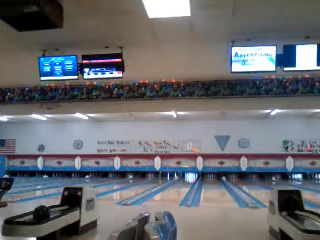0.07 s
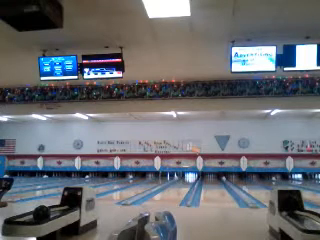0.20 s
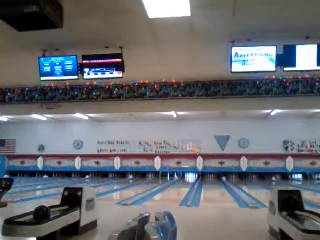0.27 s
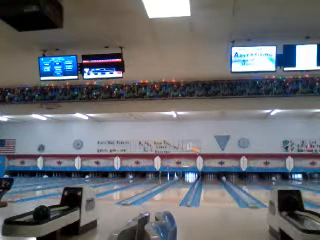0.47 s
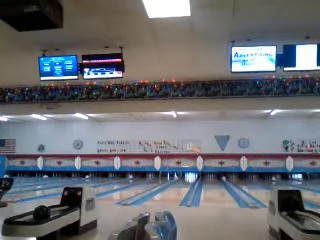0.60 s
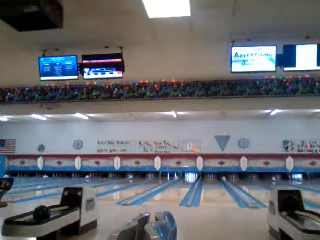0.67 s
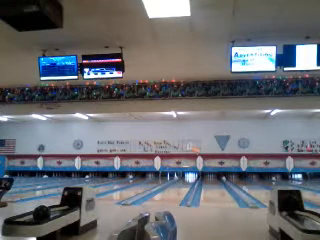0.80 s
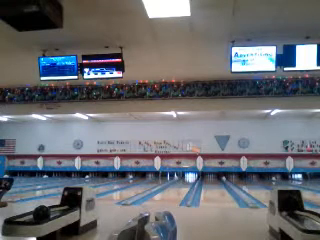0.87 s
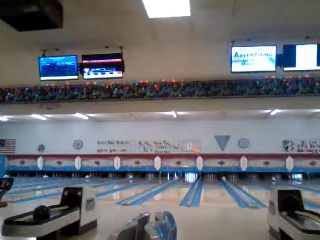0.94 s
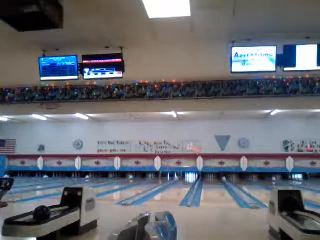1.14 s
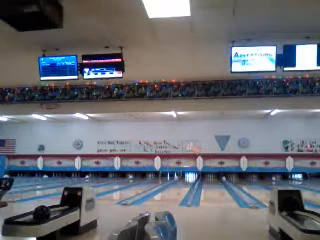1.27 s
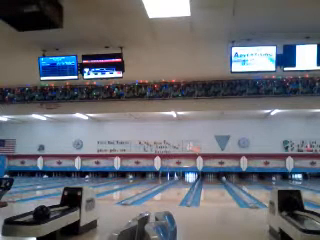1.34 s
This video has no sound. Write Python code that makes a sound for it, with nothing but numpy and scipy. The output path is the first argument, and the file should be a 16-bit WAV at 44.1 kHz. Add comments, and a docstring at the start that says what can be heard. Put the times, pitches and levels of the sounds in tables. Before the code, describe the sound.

Bowling strike at the far end of a lane: one loud hit, a dense burst of hollow pin clatter, then scattered knocks and soft rumble fading into hall echo and machine hum, narrow muffled sound.

```python
"""Bowling strike at the far end of a lane in a big reverberant hall, over a steady drone of coloured noise.
The ball cracks into the head pin; heavy knocks are strongly damped tones with bursts of contact noise.
Pins clack together and ring as decaying sines, while chance taps through resonances make them rattle and skid.
Deep thumps follow on deck and pit cushion, the ball rumbles as low noise, and pins clatter into the pit.
A dull microphone narrows the band and clips the loudest peaks."""
import sys
import numpy as np
from scipy import signal
from scipy.fft import rfft, irfft, next_fast_len
from scipy.io import wavfile
from scipy.ndimage import map_coordinates

SR = 44100
rng = np.random.default_rng(int(sys.argv[2]) if len(sys.argv) > 2 else 0)


def pcm_store(signal):
    """Save signal as 16-bit PCM."""
    levels = np.round(np.clip(np.atleast_2d(signal), -1, 1) * 32767)
    wavfile.write(sys.argv[1], SR, levels.astype(np.int16).T)


N = 63945  # length in samples

# the ball meets the head pin: t/s, envelope peak/dB, f/Hz, crack relative to the blow/dB
STRIKE = (.2236, -1.6, 655, -14)


def amp(db):
    """Decibels to linear gain."""
    return 10 ** (np.asarray(db) / 20)


def unit(x):
    """Scale a signal to an rms of 1."""
    return x / np.sqrt(np.mean(x ** 2) + 1e-20)


def clock():
    """Time of every sample in seconds."""
    return np.arange(N) / SR


def level(points):
    """Gain curve through points of t/s, level/dB, drawn straight in dB; -120 dB before the first."""
    t, db = np.transpose(points)
    return amp(np.interp(clock(), t, db, left=-120))


def filtered(x, response):
    """Multiply the spectrum of x by a response given as a function of frequency."""
    size = next_fast_len(N + SR // 2)  # spare room against wrap-around
    spectrum = rfft(x, size) * response(np.fft.rfftfreq(size, 1 / SR))
    return irfft(spectrum, size)[:N]


def noise(color):
    """Noise of rms 1, its spectrum drawn through points of f/Hz, level/dB on a log frequency axis."""
    hz, db = np.transpose(color)
    white = rng.standard_normal(N)
    return unit(filtered(white, lambda f: amp(np.interp(np.log(f + 1), np.log(hz), db))))


def resonate(x, body):
    """Drive parallel resonances, each a second-order bandpass of f/Hz, width/Hz, level/dB."""
    def response(f):
        return sum(amp(db) * 1j * f * width / (hz * hz - f * f + 1j * f * width) for hz, width, db in body)
    return filtered(x, response)


def add(out, x, t):
    """Mix x into out from t seconds on."""
    start = round(t * SR)
    out[start:start + len(x)] += x[:N - start]


def in_hall(x):
    """Direct sound, short scatter around the pin deck and a long hall tail, both drawn anew at each call."""
    # level/dB against the direct sound, t60/s, delay/s
    near_scatter = (-5.5, 0.1, 0.006)
    hall_tail = (-4.5, 1.275, 0.02)
    impulse_response = np.zeros(N)
    impulse_response[0] = 1
    for db, t60, delay in (near_scatter, hall_tail):
        tail = rng.standard_normal(N) * amp(-60 * clock() / t60)
        add(impulse_response, amp(db) * tail / np.linalg.norm(tail), delay)
    return signal.fftconvolve(x, impulse_response)[:N]


def drone():
    """Machines and rolling on other lanes: coloured noise whose level wavers at random."""
    # noise colour: f/Hz, level/dB
    drone_color = [(15, -71.5), (25, -45.5), (80, -24.5), (144, -18.5), (305, -6), (384, 4), (454, -6.5),
                   (547, -1.5), (607, -1.5), (1070, -14.5), (1140, -16.5), (1260, -21), (1370, -17.5),
                   (1990, -25.5), (2170, -20.5), (2730, -33.5), (3650, -31.5), (4740, -58.5), (8030, -120)]
    drone_db, waver_db, wavers_per_s = -38.5, 1.9, 21
    knots = rng.standard_normal(200)
    waver = map_coordinates(knots, [clock() * wavers_per_s], mode="mirror")  # smooth curve through knots
    return amp(drone_db + waver_db * waver) * noise(drone_color)


def ball_rumble():
    """The ball in the pit: low noise that swells and fades."""
    # noise colour: f/Hz, level/dB
    rumble_color = [(40, -16.5), (90, -10), (130, -20), (165, -2), (260, 4.5), (400, 2), (800, -44),
                    (2000, -92)]
    # fader moves: t/s, level/dB
    rumble_fader = [(.22, -70.5), (.34, -49), (.48, -32.5), (.6, -37), (.9, -33.5), (1.1, -38),
                    (1.2, -42.5), (1.35, -51.5)]
    return level(rumble_fader) * noise(rumble_color)


def damped(t, hz, cycles):
    """A strongly damped body: a tone that swells to its peak after the given cycles, then dies away."""
    steepness = 1.98  # of rise and fall
    u = t * hz / cycles
    envelope = (u * np.exp(1 - u)) ** steepness
    return envelope * np.sin(2 * np.pi * hz * t)


def crack(t):
    """The contact noise of a hard hit: a coloured burst with exponential decay."""
    # noise colour: f/Hz, level/dB
    contact_color = [(100, -25.5), (500, 11), (1300, 10), (1700, 1.5), (2400, -13), (2900, -26.5),
                     (3400, -22), (4200, -19.5), (8000, -49)]
    t60_s = 0.023
    return noise(contact_color)[:len(t)] * amp(-60 * t / t60_s)


def knocks():
    """Ball and pins hit pins, deck and boards: a few cycles of a damped body plus a crack, in the hall."""
    # heavy knocks: t/s, envelope peak/dB, f/Hz, crack relative to the knock/dB
    heavy_hits = [(0.2227, -23, 705, 1.5), (.2315, -11, 768, -22), (.238, -22.5, 607, -0.5),
                  (.2455, -17.5, 700, -22.5), (.2762, -12.5, 735, -16.5), (.2862, -6, 710, -38),
                  (.3142, -10.5, 711, -13), (.329, -14, 410, -26.5), (.3372, -17.5, 549, -19),
                  (.388, -14, 398, -39), (.4081, -5, 549.6, -29.5), (.4131, -7, 691, -22),
                  (.4345, -18.5, 553, -3.5), (0.4452, -34, 494, -25.5), (.468, -10.5, 517, -9.5),
                  (0.474, -10, 420, -16.5), (0.485, -21, 307.5, -3), (0.5437, -12.5, 407, -6),
                  (.608, -20.5, 372, -27.5), (0.632, -17.5, 467, -18.5), (.6555, -13.5, 595, -14.5),
                  (0.674, -21, 454, -7), (.6802, -13, 480, -13.5), (0.702, -15.5, 470, -11),
                  (.759, -14.5, 411, -9), (.798, -19, 398, -19.5), (0.8444, -11, 384, -27.5),
                  (.857, -19, 486, -14), (0.9185, -18, 497, -29), (0.9233, -14.5, 465, -22.5),
                  (.96, -14.5, 454, -22.5), (.976, -15, 610, -21), (.985, -16, 579, -26.5),
                  (1.041, -22.5, 451, -9.5), (1.062, -18, 606, -27), (1.085, -22, 290, -13),
                  (1.115, -21, 305.7, -13), (1.1516, -15.5, 548, -26), (1.158, -18, 706, -38),
                  (1.166, -26, 433, -20.5), (1.22, -28, 546, -7.5)]
    cycles_to_peak = 1.114
    out, t = np.zeros(N), np.arange(SR // 8) / SR
    for start, db, hz, crack_db in [STRIKE, *heavy_hits]:
        body = damped(t, hz, cycles_to_peak)
        hit = body + amp(crack_db) * crack(t)
        add(out, in_hall(amp(db) * hit), start)
    return out


def ring(modes, t):
    """Struck pin modes: decaying sines of f/Hz, level/dB, t60/s behind a softened attack."""
    attack_s = 0.0015  # time constant
    tone = sum(amp(db - 60 * t / t60) * np.sin(2 * np.pi * hz * t) for hz, db, t60 in modes)
    return tone * (1 - np.exp(-t / attack_s))


def clacks():
    """Pin on pin: each clack rings in modes around its own pitch, with a crack; the head pin has its own modes."""
    # head pin, rung by the full force of the ball: f/Hz, level/dB, t60/s
    head_pin = [(678.4, -16, 0.22), (1444, -39.5, .2), (1490, -35.5, 0.25), (1870, -33.5, 0.041),
                (2256, -37, .06), (3355, -30, 0.038), (3634, -26.5, .035)]
    # clacks, pins in flight ring longest: t/s, level/dB, main ring f/Hz, main ring t60/s
    pin_hits = [(0.223, -17, 1024, .15), (.228, -18.5, 793, .2), (.2495, -7, 1112, .06),
                (.263, -17, 999.6, .35), (0.276, -15, 1075, .12), (0.3099, -5, 1226, .05),
                (0.3217, -5.5, 1148, .1), (.3305, -11, 1203, .08), (.343, -20.5, 1036, .2),
                (.362, -16.5, 998, 0.098), (.3745, -11.5, 1211, .12), (0.3997, -9, 1195, .1),
                (.421, -12.5, 1106, .08), (0.4337, -7.5, 1168, .08), (0.454, -25.5, 1240, .2),
                (.469, -12, 1170, .06), (.507, -14, 1130, .1), (.522, -18.5, 1223, .25),
                (0.542, -24.5, 1176, .08), (.586, -23.5, 1218, .2), (0.601, -31.5, 1084, .06),
                (.654, -21, 1199, .15), (0.674, -17.5, 1204, .06), (.691, -19.5, 1198, .1),
                (0.761, -19.5, 1191, .2), (.783, -19.5, 1190, .08), (.809, -23.5, 1220, .08),
                (.866, -27, 1114, 0.056), (0.918, -22.5, 994, 0.072), (.959, -21, 891, 0.15),
                (0.968, -26, 1216, .08), (1.012, -21, 1062, .05), (1.2, -22.5, 1038, 0.075)]
    # modes of a pin: ratio to main ring, level/dB, share of its t60
    pin_modes = [(.565, -9.5, 0.84), (.74, -11.5, .8), (1, -1.5, 0.59), (1.27, -25, 0.35),
                 (1.62, -26.5, 0.53), (2.02, -34, 0.3), (2.85, -43.5, 0.13)]
    crack_db = -16.5  # relative to the clack
    out, t = np.zeros(N), np.arange(SR // 2) / SR
    add(out, in_hall(ring(head_pin, t)), STRIKE[0])
    for start, db, hz, t60 in pin_hits:
        # mode levels vary by about 1 dB from hit to hit
        modes = [(hz * ratio, mode_db + rng.standard_normal(), t60 * share)
                 for ratio, mode_db, share in pin_modes]
        hit = ring(modes, t) + amp(crack_db) * crack(t)
        add(out, in_hall(amp(db) * hit), start)
    return out


def rattle(fader, body):
    """Many light contacts at chance moments and strengths, in the hall, ring a resonant body."""
    contacts_per_s, scatter_db = 170, 3
    touches = rng.random(N) < contacts_per_s / SR
    polarity = rng.choice([-1, 1], N)
    strength = amp(scatter_db * np.clip(rng.standard_normal(N), -2, 2))
    taps = touches * polarity * strength
    return level(fader) * unit(resonate(in_hall(taps), body))


def pin_rattle():
    """Tumbling pins: light contacts ring narrow pin resonances."""
    # fader moves: t/s, level/dB
    pin_fader = [(.225, -23.5), (.25, -45), (.33, -31), (.45, -33), (.6, -40), (.8, -41), (1, -48),
                 (1.25, -50), (1.45, -56.5)]
    # pin resonances: f/Hz, width/Hz, level/dB
    pin_body = [(680, 8.7, 1.5), (775, 23, 4.5), (899, 10, -4), (993, 2.2, 13.5), (1092, 8, -9.5),
                (1014, 19, -7), (1199, 9, 10), (1276, 5.6, 7.5)]
    return rattle(pin_fader, pin_body)


def deck_rattle():
    """Pins tumbling on the deck: light contacts ring its lower resonances."""
    # fader moves: t/s, level/dB
    deck_fader = [(.225, -48), (.33, -38), (.45, -34), (.6, -32.5), (.7, -32.5), (.88, -36), (.97, -42.5),
                  (1.13, -42.5), (1.22, -61), (1.45, -59.5)]
    # deck resonances: f/Hz, width/Hz, level/dB
    deck_body = [(256, 30, -2), (298.6, 8.3, 20.5), (375, 14, 0.5), (410, 11, -8.5), (510, 10, 1.5),
                 (503, 14, -3.5), (603, 47, -13), (675, 70, 6), (833.3, 100, -15)]
    return rattle(deck_fader, deck_body)


def scrape():
    """Pins skidding and chattering: light contacts through broad, high resonances."""
    # fader moves: t/s, level/dB
    scrape_fader = [(.225, -62), (.33, -52.5), (.45, -43.5), (.58, -59), (.69, -41), (.8, -54.5),
                    (.95, -84), (1.09, -50), (1.16, -90), (1.45, -89)]
    # scrape resonances: f/Hz, width/Hz, level/dB
    scrape_body = [(1430, 300, -20.5), (1950, 200, 19), (2400, 100, -21), (3350, 1800, -14.5)]
    return rattle(scrape_fader, scrape_body)


def thumps():
    """The deck and the pit's cushion give deep damped tones, mixed in dry."""
    # thumps: t/s, envelope peak/dB, f/Hz
    deep_hits = [(0.334, -41.5, 80), (0.387, -44, 70), (.464, -36.5, 92), (.835, -37.5, 90),
                 (1.068, -33.5, 160)]
    cycles_to_peak = 1.1
    out, t = np.zeros(N), np.arange(SR // 8) / SR
    for start, db, hz in deep_hits:
        add(out, amp(db) * damped(t, hz, cycles_to_peak), start)
    return out


def pit_rattle():
    """Pins landing in the pit: light contacts ring its resonances."""
    # fader moves: t/s, level/dB
    pit_fader = [(.87, -60), (.92, -33.5), (.975, -38.5), (1.03, -38.5), (1.11, -48), (1.16, -42.5),
                 (1.24, -47), (1.36, -50)]
    # pit resonances: f/Hz, width/Hz, level/dB
    pit_body = [(525, 17, -9.5), (655, 76, 1), (712, 130, 18), (790, 89, -8.5)]
    return rattle(pit_fader, pit_body)


def scene():
    """Mix the drone, the ball, the heavy hits and the tumble of light contacts to one channel."""
    background = drone() + ball_rumble()
    hits = knocks() + clacks() + thumps()
    tumble = pin_rattle() + deck_rattle() + scrape() + pit_rattle()
    return (background + hits + tumble)[None]


def record(dry):
    """A narrow-band microphone that clips the loudest peaks flat, then a steep top cut."""
    low_hz, edge_hz, clip_at, top_hz = 58, 3502, 0.71, 16000

    def microphone(f):
        low_cut = f ** 2 / np.hypot(f ** 2, low_hz ** 2)
        high_cut = 1 / np.sqrt(1 + (f / edge_hz) ** 32)
        return low_cut * high_cut

    dull = filtered(dry[0], microphone)
    clipped = np.clip(dull, -clip_at, clip_at)
    return filtered(clipped, lambda f: f < top_hz)[None]


dry = scene()
out = record(dry)
pcm_store(out)
```